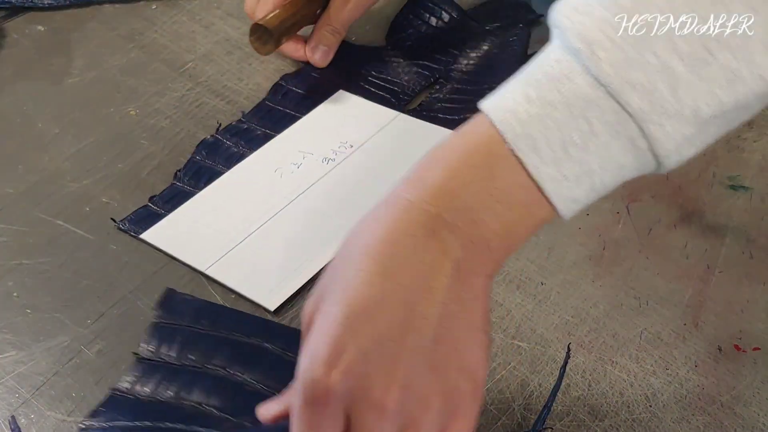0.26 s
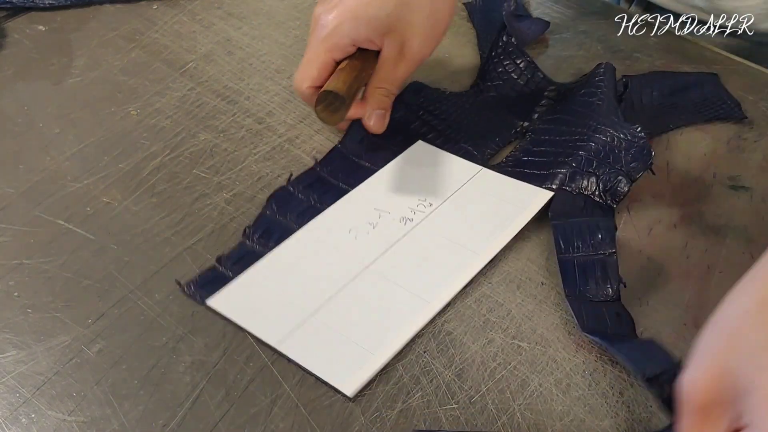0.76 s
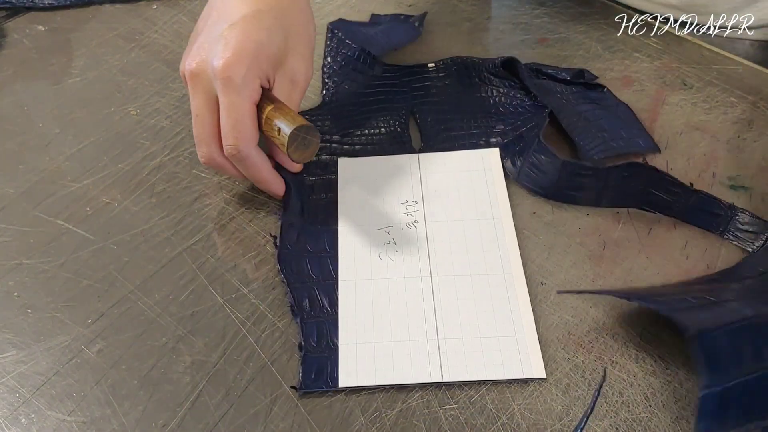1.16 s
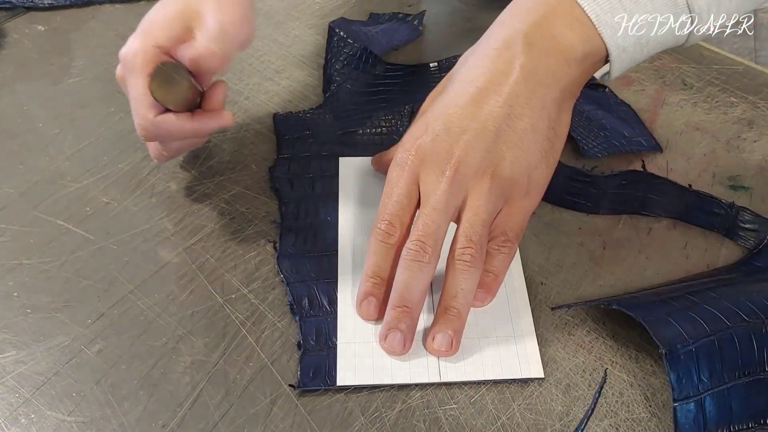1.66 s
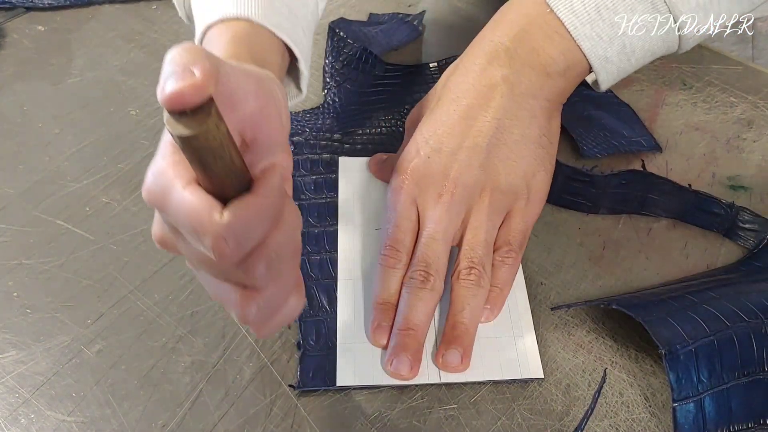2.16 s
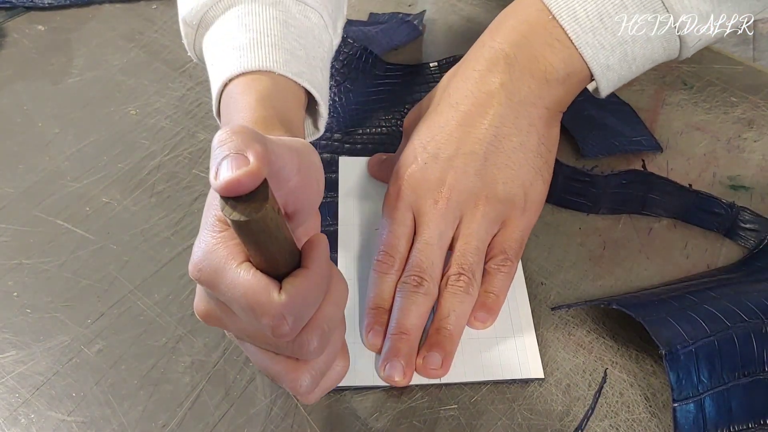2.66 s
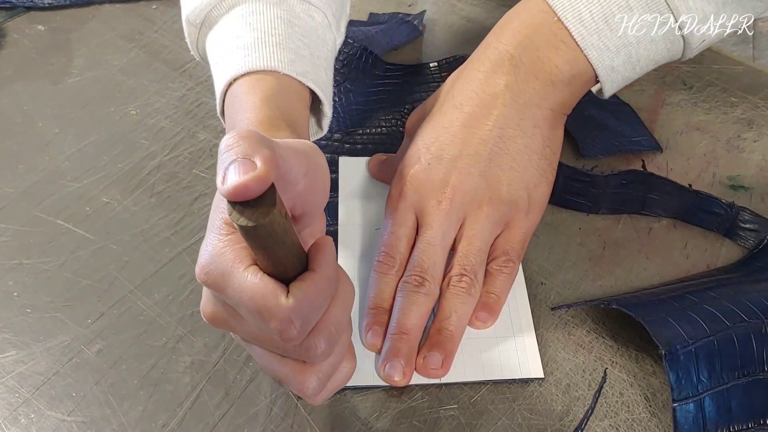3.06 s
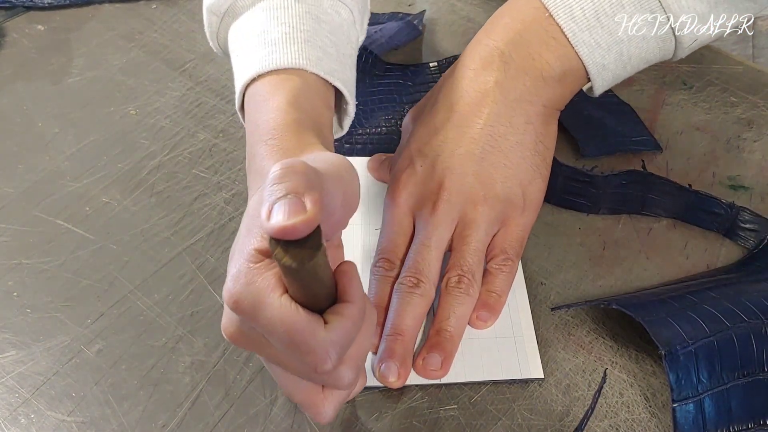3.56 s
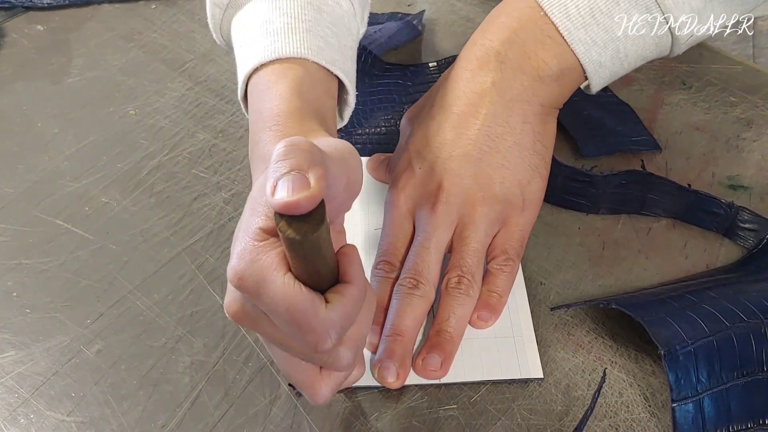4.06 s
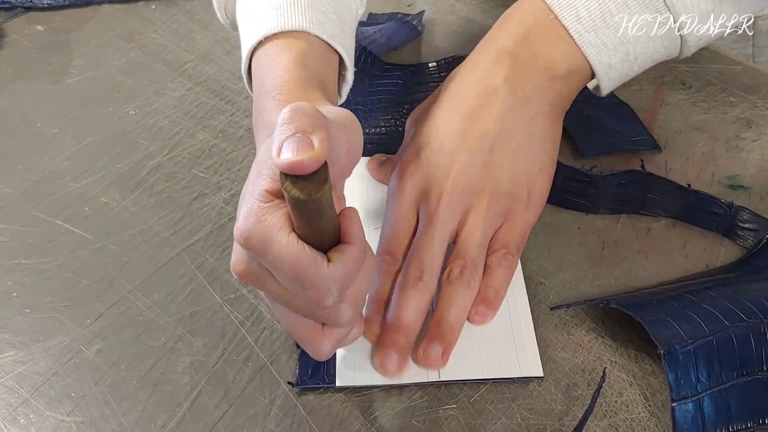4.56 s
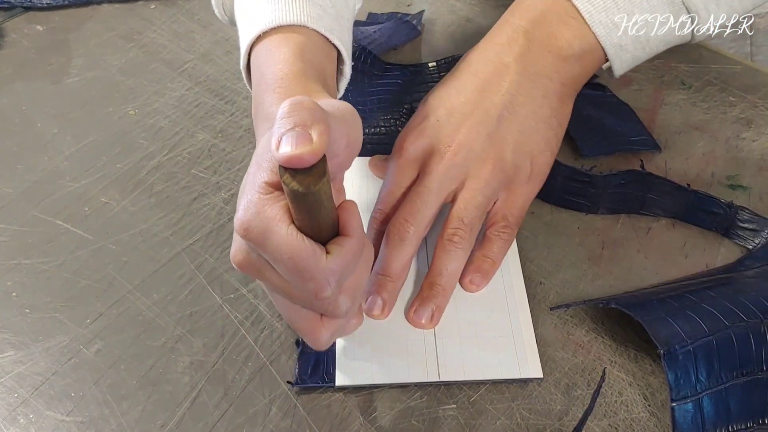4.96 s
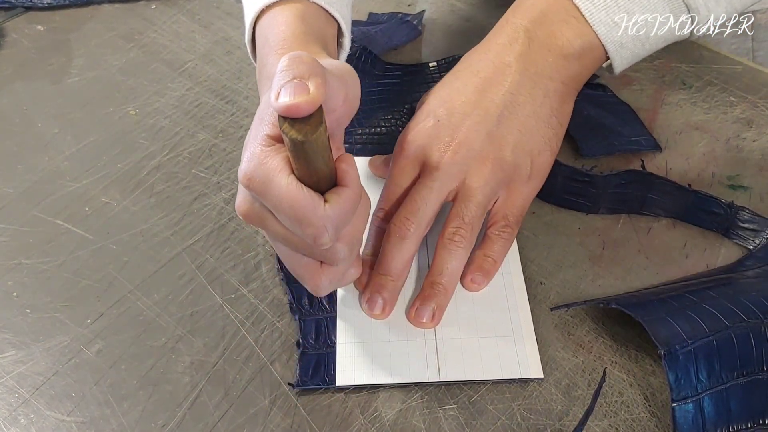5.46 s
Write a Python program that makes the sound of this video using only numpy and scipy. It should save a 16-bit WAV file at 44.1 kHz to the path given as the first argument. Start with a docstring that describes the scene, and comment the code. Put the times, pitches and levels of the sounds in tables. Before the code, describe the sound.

Close handling of thick leather: raspy scuffs, a clacking turn of card and hide, then dull bench thumps and brief stick-slip creaks of a blade. After quiet, small ticks lead to a hissing slice, a rapid tearing run and a hard snap, then smaller cuts. Small, slightly live room, faint hum, stereo phone leaning right.

```python
"""Leather scuffs and rasps as it is dragged over a bench; a blade creaks, hisses, snaps free and hisses
on through a few more short cuts. Place: a small workshop with a faint hum. Distance: close.
Microphone: a phone with two ports, the right one favoured. Filtered grains make the hide and its
card template, slip impulses the creak, short clicks and cracks the parting fibres, a swaying low
mode and rumble the bench top."""
import sys
import numpy as np
from scipy import signal
from scipy.fft import rfft, irfft, next_fast_len
from scipy.io import wavfile
from scipy.ndimage import map_coordinates

SR = 44100
rng = np.random.default_rng(int(sys.argv[2]) if len(sys.argv) > 2 else 0)


def wav_record(signal):
    """Record a signal, one row per channel, as 16-bit PCM in the file named by sys.argv[1]."""
    frames = np.transpose(np.atleast_2d(signal))
    bounded = np.clip(frames, -1, 1)
    # unit amplitude maps onto the largest positive 16-bit level
    quanta = np.round(bounded * 32767).astype(np.int16)
    wavfile.write(sys.argv[1], SR, quanta)


N = 251370
TIME = np.arange(N) / SR

# Levels of the work are relative: mixing gains, room and microphone follow.
# Still air of the workshop: (frequency [Hz], relative level [dB per Hz])
AIR_SPECTRUM = [(13, -13), (22, -3.5), (49, 7), (215, -10.5), (246, -6.5), (324, -19.5), (414, -9),
                (450, -11.5), (1350, -28.5), (1590, -22), (1730, -22.5), (3070, -28), (6440, -38),
                (7390, -44), (15500, -58)]
AIR_DB = -66.5  # before the balance of the two ports
# Faint hum: (frequency [Hz], level before waver and port balance [dB])
HUM_TONES = [(407.6, -78.5), (111.6, -74.5), (136, -107)]

# A hand or the knife bears down on the bench:
# (time of greatest weight [s], half length to 20 dB down [s], boom level [dB])
BENCH_PRESSES = [(0.083, 0.061, -42.5), (0.477, 0.029, -46.5), (0.904, 0.045, -42.5), (1.943, 0.048, -36),
                 (2.018, 0.036, -36.5), (2.129, 0.028, -46), (2.251, 0.046, -48.5), (2.674, 0.062, -48.5),
                 (2.81, 0.038, -51.5), (3.677, 0.075, -55), (3.907, 0.088, -46), (4.358, 0.032, -50),
                 (4.464, .04, -51), (4.545, 0.055, -48), (4.623, 0.039, -48.5), (4.855, 0.049, -44.5),
                 (4.936, 0.015, -35.5), (4.984, 0.054, -33.5), (5.402, 0.027, -43.5), (5.511, 0.029, -43),
                 (5.612, 0.036, -44.5)]
BOOM_HZ = 132.5  # lowest mode of the bench
# Dull rumble around the boom: (frequency [Hz], relative level [dB per Hz])
RUMBLE_SPECTRUM = [(30, -6.5), (60, -5.5), (110, 8.5), (190, 5.5), (300, -9), (520, -13), (800, -33.5),
                   (2000, -45.5)]

# Short scuffs, groans and squeaks of fingers, hide and blade:
# (centre time [s], half length, at most 0.1 in use [s], centre [Hz], width [Hz], level [dB])
SCUFF_EVENTS = [(.085, 0.056, 1680, 405, -63), (0.21, .025, 2900, 1510, -55),
                (0.469, .05, 1850, 700, -58.5), (0.561, 0.047, 3300, 3100, -59.5),
                (0.612, 0.014, 2590, 350, -52.5), (0.672, 0.025, 1660, 403, -54.5),
                (0.756, 0.035, 1340, 496, -52), (.89, 0.033, 1710, 500, -44), (.991, .11, 2450, 500, -51.5),
                (1.246, 0.033, 1340, 900, -65), (1.477, 0.072, 740, 513, -56.5),
                (1.473, .035, 2010, 1360, -52.5), (2.086, 0.061, 244, 99.7, -40.5),
                (2.193, .04, 288, 60, -55), (3.043, 0.026, 3030, 3150, -78),
                (3.459, .055, 1669, 1080, -68.5), (4.39, 0.038, 2580, 140, -71.5),
                (4.472, .04, 2580, 140, -74), (4.609, 0.031, 4850, 10500, -61.5),
                (4.835, 0.054, 815, 220, -55), (5.274, .012, 3530, 450, -56.5),
                (5.314, 0.054, 3630, 300, -71)]

# Fibres parting and small knocks of blade, card and handle:
# (time [s], click level [dB], bench knock level [dB], click pitch [Hz])
TICK_EVENTS = [(.052, -50, -49, 1950), (.079, -44, -58, 1490), (.399, -47, -60.5, 2660),
               (.745, -43, -75, 1410), (.835, -24, -41.5, 1460), (.904, -31, -49.5, 1250),
               (.911, -29, -43, 1290), (1.464, -39.5, -61, 1930), (2.083, -55, -33, 1535),
               (2.336, -60, -33.5, 1900), (3.387, -60, -52, 2320), (3.588, -60, -53.5, 2303),
               (3.633, -56.5, -51, 2281), (3.708, -60.5, -49, 2220), (3.768, -59.5, -45, 2651),
               (3.82, -53, -43.5, 1940), (3.86, -57.5, -37.5, 2790), (3.877, -57, -38, 2800),
               (4.104, -43, -54, 4264), (4.137, -31, -45, 4200), (4.528, -57, -48, 2266),
               (4.598, -48.5, -65, 3260), (4.616, -43, -55.5, 2800), (4.9186, -13, -34.5, 2975),
               (4.965, -15.5, -40.5, 2790), (5.495, -53, -45, 2220), (5.508, -47.5, -43, 2300),
               (5.559, -41, -73, 4900), (5.566, -47, -69, 5080), (5.591, -44.5, -55.5, 2800)]
# Modes of the bench top: (frequency [Hz], level before a small scatter [dB], t60 [s])
BENCH_MODES = [(204.6, -2, 0.14), (268.5, -3.5, 0.14), (302.4, -14, 0.25), (415.1, -2, 0.18),
               (499.6, -4, 0.15), (637, -6, 0.09), (757, -12.5, .06), (895, -8.5, 0.037),
               (934.5, -13.5, 0.093)]
# Spectrum of a crack of fibres: (multiple of the click pitch [ratio], level [dB])
CRACK_SPECTRUM = [(.2, -25), (0.452, -10.5), (0.699, 4), (1.1, -0.5), (1.6, 2), (2.4, -5.5), (3.6, -7),
                  (4.8, -24)]
# Resonances of the knife when a catch lets go: (frequency [Hz], level [dB])
KNIFE_MODES = [(2310, -11.5), (2480, -18), (3320, -17)]

# Hide and card pushed over the bench: (start time [s], length [s], time to rise or fall 20 dB [s],
# rub [dB], fine hiss [dB], card [dB], bench boom [dB], swell start to end [dB], arch in the middle [dB])
HIDE_SLIDES = [(0.089, 0.17, 0.3, -75.5, -67, -85, -67, 2.5, 7),
               (0.373, 0.18, 0.26, -56.5, -60.5, -77, -68, 9.5, 1.5),
               (0.61, .18, 0.22, -57.5, -69.5, -64.5, -61.5, 2.5, -1.5),
               (0.853, 0.3, 0.06, -51, -56.5, -50.5, -61, -0.5, 6),
               (1.458, 0.27, 0.1252, -52.5, -62.5, -74, -82, 5.5, -2)]
# Resonances of the sliding card: (frequency [Hz], width [Hz], level [dB])
CARD_MODES = [(990, 270, -2.5), (1260, 157, -3), (1610, 180, -11), (2406, 226, -8), (3470, 950, -17),
              (5800, 300, -27.5)]
# Rub of the hide, with a low rumble of the handled phone beneath:
# (frequency [Hz], relative level [dB per Hz])
RUB_SPECTRUM = [(35, 7), (90, -6), (220, -9), (450, -8.5), (800, -9.5), (1300, -4.5), (2000, 3),
                (2600, -7.5), (3200, -10), (5000, -31)]
# Fine hiss of the sliding hide: (frequency [Hz], relative level [dB per Hz])
FINE_SPECTRUM = [(500, -9), (1500, 4.5), (3000, 2), (5000, -2), (8000, 0.5), (16000, -13)]
FLUTTER_DB, FLUTTER_PER_S = 1.5, 22  # a sliding hide grips unevenly
# The sliding hide rasps now in one band, now in another: (centre [Hz], width [Hz], level [dB])
RASP_BANDS = [(1355, 200, 0), (1660, 180, 2), (2050, 240, -1.5), (2490, 220, -3.5)]
# Level beside the rub [dB], depth [dB] and speed [per s] of the changes
RASP_DB, RASP_SWING_DB, RASP_PER_S = -9.5, 7.5, 25

# Strokes in which the blade sticks and slips: (start time [s], length [s], creak level [dB],
# crispness [dB], swell [dB], top pace before unevenness [slips per s], unevenness [0-1])
CREAK_STROKES = [(2.028, 0.061, -40.5, -61.5, 1, 337, 0.08), (2.12, 0.082, -60.5, -108, -8, 293, .25),
                 (2.337, .055, -37.5, -64, -6.5, 318, .04), (2.411, 0.11, -55, -95, 6, 340, .2),
                 (3.35, .125, -58, -87, 14.5, 200, .65), (3.63, 0.082, -68.5, -86, 4, 125, 0.46),
                 (3.78, 0.13, -46.5, -84, 3.5, 135, 0.39)]
STROKE_ATTACK_S, STROKE_RELEASE_S = 0.024, 0.02  # time to rise or fall 20 dB
# Shares of the top pace: at the ends of a stroke, and while the blade barely moves
END_PACE, SLOWEST_PACE = .65, .42
# The bench groans under the blade: (centre [Hz], width [Hz], level [dB])
GROAN_MODES = [(240, 70, -1.5), (307, 40, -3.5)]
GROAN_DB, STROKE_BOOM_DB = -13, -5.5  # relative to the creak
CRISP_SCATTER_DB = 3  # a few slips tick much louder than the rest
CREAK_LOW_HZ = 120  # the bench hardly radiates below this

# The blade gliding through the hide: (start time [s], length [s], hiss [dB], blade whistle [dB],
# rub on the card's edge [dB], bench boom [dB], swell [dB])
BLADE_PULLS = [(4.132, 0.36, -68.5, -65.5, -76, -68.5, -6.5), (4.938, 0.28, -65.5, -65, -70, -48, -12),
               (5.269, .15, -64.5, -67, -63.5, -53.5, 1), (5.56, 0.044, -60.5, -71, -71.5, -60, -5)]
# Time to rise 20 dB, as a share of the length (a long pull starts more gently), and to fall 20 dB
PULL_ATTACK_SHARE, PULL_RELEASE_S = 0.43, 0.078
# Central pitch of the blade's whistle: (time [s], frequency [Hz])
WHISTLE_PITCH = [(4.15, 2115), (4.38, 2256), (5.1, 2252), (5.45, 2233)]
# Resonances of the blade against the card: (frequency [Hz], width [Hz], level [dB])
BLADE_MODES = [(846, 37, 0), (1810, 64, -5.5), (2223, 41, 1.5), (3340, 94, -14.5), (3750, 40, -28.5),
               (5030, 390, -22)]
# Hiss of the cut: (frequency [Hz], relative level [dB per Hz])
FIBRE_SPECTRUM = [(500, -8), (1500, 1.5), (3000, 3), (5000, -2.5), (7500, 3), (12000, -7.5), (16000, -19)]

# A tough strip of hide gives way in catches that come ever faster and higher
TEAR_START_S, TEAR_GAP_S, TEAR_SHRINK = 4.799, .025, .84  # first catch, first gap, gap over gap before
TEAR_CLICK_DB, TEAR_KNOCK_DB, TEAR_SCATTER_DB = -37.5, -38, 1  # central levels and their scatter
TEAR_EASE_DB = 1  # each catch tends to push the bench less than the one before
TEAR_HZ, TEAR_STEP_HZ = 2090, 80  # pitch of the first click, rise per catch

# Decay of the workshop: (frequency [Hz], t60 [s])
ROOM_DECAY = [(130, 0.41), (400, 0.35), (2500, 0.33), (7000, 0.29), (14000, 0.61)]
# The microphone's port rings near 7 kHz and shuts out what lies above: (frequency [Hz], gain [dB])
PORT_RESPONSE = [(5600, -0.5), (6300, 0.5), (6800, 13), (7200, 14), (7800, 2), (8800, -23), (10200, -14),
                 (11500, -9.5), (12700, -8), (14000, -12), (15500, -24.5)]
# The left port faces away from the bench: (frequency [Hz], left minus right [dB])
LEFT_SHADE = [(130, -8.5), (500, -12), (1100, -13.5), (2200, -27.5), (4500, -15), (7100, -29.5),
              (9000, -8.5), (11500, -8), (15000, -8.5)]
TOP_HZ = 15800  # the phone's band limit


def amp(db):
    """Decibels to gain."""
    return 10 ** (np.asarray(db) / 20)


def unit(x):
    """Scale to rms 1."""
    return x / np.sqrt(np.mean(x ** 2) + 1e-20)


def along(points, hz):
    """(Hz, value) points read on a log axis."""
    f, v = np.transpose(points)
    return np.interp(np.log(hz + 1), np.log(f + 1), v)


def wobble(rate):
    """A smooth random curve, rate knots a second."""
    knots = rng.standard_normal(int(N * rate / SR) + 4)
    return map_coordinates(knots, [TIME * rate])


def filtered(x, response):
    """x times a complex response of frequency."""
    m = 2 * next_fast_len(N // 2 + SR // 4)
    return irfft(rfft(x, m) * response(np.fft.rfftfreq(m, 1 / SR)), m)[..., :N]


def coloured(x, points):
    """Causal filter with the gain of (Hz, dB) points."""
    def response(hz):
        # fold the cepstrum forward in time for minimum phase
        cepstrum = irfft(np.log(amp(along(points, hz))))
        half = len(cepstrum) // 2
        cepstrum[1:half] *= 2
        cepstrum[half + 1:] = 0
        return np.exp(rfft(cepstrum))
    return filtered(x, response)


def resonant(x, modes):
    """x through parallel (Hz, width Hz, dB) resonances of alternating sign."""
    def response(f):
        total = 0
        for k, (centre, width, db) in enumerate(modes):
            damping = 1j * f * width
            total = total + (-1) ** k * amp(db) * damping / (centre ** 2 - f * f + damping)
        return total
    return filtered(x, response)


def grains(rate, spread_db):
    """Dense tiny impulses of uneven size, rms 1."""
    chance, size = rng.random(N), rng.standard_normal(N)
    return unit((chance < rate / SR) * size * amp(spread_db * wobble(250)))


def stroke(start, length, attack_s, release_s, swell_db, arch_db=0):
    """Gain of one movement: attack, a hold that swells and arches, release."""
    u = np.clip((TIME - start) / length, 0, 1)
    before = np.maximum(start - TIME, 0) / attack_s
    after = np.maximum(TIME - start - length, 0) / release_s
    hold_db = swell_db * (u - .5) + arch_db * np.sin(np.pi * u)
    return amp(hold_db - 20 * np.minimum(before + after, 10))


def background():
    """Still workshop air, partly shared by both ports, with a faint hum that wavers slightly."""
    shared = rng.standard_normal(N)
    separate = 1.6 * rng.standard_normal((2, N))
    air = unit(coloured(shared + separate, AIR_SPECTRUM))
    hum = 0
    for hz, db in HUM_TONES:
        level = amp(db + 1.5 * wobble(4.1))
        hum = hum + level * unit(np.sin(2 * np.pi * hz * TIME + .5 * wobble(3.4)))
    return (amp(AIR_DB) * air + hum) * amp([[-4], [3]])  # left, right


def boom(work):
    """Each press, and more weakly all the work, sways the bench's lowest mode, with a dull rumble around it."""
    presses = [amp(db - 20 * np.minimum(((TIME - s) / half) ** 2, 10)) for s, half, db in BENCH_PRESSES]
    lean = np.linalg.norm(presses + [work * amp(2.6 * wobble(16))], axis=0)
    sway = unit(np.sin(2 * np.pi * BOOM_HZ * TIME + 0.8 * wobble(12)))
    rumble = unit(coloured(rng.standard_normal(N), RUMBLE_SPECTRUM))
    return lean * (amp(-1.5) * sway + amp(-10) * rumble)


def scuffs():
    """A brief rub excites one band of resonance for a moment."""
    out, hz = np.zeros(N + SR), np.fft.rfftfreq(SR // 4, 1 / SR)
    for s, half, centre, width, db in SCUFF_EVENTS:
        band = 1 / (1 + (2 * (hz - centre) / width) ** 2)
        rub = irfft(rfft(rng.standard_normal(SR // 4)) * band)
        swell = np.hanning(min(round(2 * half * SR), SR // 5))
        first = max(round((s - half) * SR), 0)
        out[first:][:len(swell)] += amp(db - 3.5) * unit(swell * rub[:len(swell)])
    return out[:N]


def bench_ring(thump_db, thump_t60):
    """The bench's answer to one push, peak 1: a dull thump and its decaying modes."""
    t = np.arange(SR // 4) / SR
    ring = amp(thump_db - 60 * t / thump_t60) * np.sin(2 * np.pi * 430 * t)
    for k, (hz, db, t60) in enumerate(BENCH_MODES):
        decay = amp(db + rng.normal(0, 1) - 60 * t / t60)
        ring += (-1) ** k * decay * np.sin(2 * np.pi * hz * t)
    ring = signal.sosfilt(signal.butter(4, 1050, fs=SR, output="sos"), ring)
    return ring / np.abs(ring).max()


def ticks(rows, cycles, click_level_db, crack_db, crack_t60, ring_db):
    """Each break is a short click, a crack of fibres, a damped ring of the knife and a knock in the bench."""
    out, t = np.zeros(N + SR), np.arange(SR // 4) / SR
    ratio, level = np.transpose(CRACK_SPECTRUM)
    knife = sum(amp(db) * np.sin(2 * np.pi * hz * t) for hz, db in KNIFE_MODES)
    for s, click_db, knock_db, hz in rows:
        age = t * hz / cycles
        click = np.sin(2 * np.pi * hz * t) * (2 * age) ** 2 * np.exp(2 - 4 * age)
        # a light catch lets the knife ring on; a loud snap is over at once
        life = np.interp(click_db, [-30, -18], [.03, .005])
        ring = amp(ring_db - 60 * t / life) * knife
        crack = amp(crack_db - 60 * t / crack_t60) * rng.standard_normal(len(t))
        crack[round(1.25 * SR / hz)] += amp(6)  # the instant of parting
        shape = amp(np.interp(np.fft.rfftfreq(len(t), 1 / SR) / hz, ratio, level))
        crack = irfft(rfft(crack) * shape, len(t))
        crack[-(SR // 200):] = 0  # drop what the filter wraps from before the start
        knock = bench_ring(thump_db=6.5, thump_t60=0.021)
        snap = amp(click_db) * (amp(click_level_db) * click + ring + crack)
        out[round(s * SR):][:len(t)] += snap + amp(knock_db - 3.5) * knock
    return out[:N]


def slide_levels():
    """Gains of rub, fine hiss, card and bench boom: one movement drives all four."""
    return sum(np.outer(amp(levels), stroke(s, length, ramp, ramp, swell, arch))
               for s, length, ramp, *levels, swell, arch in HIDE_SLIDES)


def drag(rub, fine, turn):
    """The hide's grain catches on the bench and rasps in shifting bands; the stiff card rings as it swings."""
    grip = amp(FLUTTER_DB * wobble(FLUTTER_PER_S))
    card = unit(resonant(grains(rate=1500, spread_db=0), CARD_MODES))
    catches = grains(rate=1800, spread_db=0)
    rasp = 0
    for band in RASP_BANDS:
        swing = amp(RASP_SWING_DB * np.tanh(wobble(RASP_PER_S)))
        rasp = rasp + resonant(catches, [band]) * swing
    grain = unit(coloured(grains(rate=1800, spread_db=0.5), RUB_SPECTRUM))
    hide = grip * rub * (amp(-7) * grain + amp(RASP_DB) * unit(rasp))
    hiss = unit(coloured(grains(rate=9000, spread_db=2.5), FINE_SPECTRUM))
    return amp(0.5) * turn * card + hide + amp(-6.5) * fine * hiss


def stroke_levels():
    """Gains of creak and crispness as the blade is forced on."""
    return sum(np.outer(amp(levels), stroke(s, length, STROKE_ATTACK_S, STROKE_RELEASE_S, swell))
               for s, length, *levels, swell, _, _ in CREAK_STROKES)


def slip_train():
    """One impulse per slip; the underlying pace is highest in the middle of the nearest stroke."""
    start, length, *_, top, uneven = np.transpose(CREAK_STROKES)
    offset = np.abs(TIME[:, None] - start - length / 2)
    k = np.argmin(offset - length / 2, axis=1)  # nearest stroke
    from_middle = np.minimum(2 * offset[np.arange(N), k] / length[k], 2)
    rate = top[k] * np.maximum(END_PACE ** from_middle ** 2, SLOWEST_PACE)
    slip_count = np.cumsum(rate * np.exp(uneven[k] * wobble(170))) / SR
    at = np.flatnonzero(np.diff(np.floor(slip_count)))
    scatter = amp((1.5 - 1.1 * uneven[k]) * rng.standard_normal(N))
    slips = np.zeros(N)
    slips[at] = (np.sqrt(SR / rate) * scatter)[at]
    return slips


def creaks(push, crisp):
    """The blade sticks and slips; each slip pushes the bench, makes it groan and gives a crisp tick."""
    slips = slip_train()
    ring = bench_ring(thump_db=8.5, thump_t60=0.033)
    body = signal.fftconvolve(slips * push, ring / np.linalg.norm(ring))[:N]
    groan = resonant(slips * push, GROAN_MODES) / np.std(resonant(slips, GROAN_MODES))
    highpass = signal.butter(2, CREAK_LOW_HZ, "high", fs=SR, output="sos")
    low = signal.sosfilt(highpass, amp(-4.5) * body + amp(GROAN_DB) * groan)
    sizes = amp(CRISP_SCATTER_DB * np.clip(rng.standard_normal(N), -2, 2))
    # each slip opens a noise burst that dies with a time constant of 2.1 ms
    burst = signal.lfilter([1], [1, -np.exp(-1 / (0.0021 * SR))], slips * sizes)
    tear = burst * rng.standard_normal(N)
    crisp_points = [(400, -3), (1300, 10), (2000, 16.5), (4500, 4.5), (9000, 4.5), (16000, 0.5)]
    return low + amp(-1) * crisp * unit(coloured(tear, crisp_points))


def pull_levels():
    """Gains of hiss, whistle, edge rub and bench boom as the blade is pulled."""
    return sum(np.outer(amp(levels), stroke(s, length, PULL_ATTACK_SHARE * length, PULL_RELEASE_S, swell))
               for s, length, *levels, swell in BLADE_PULLS)


def slicing(hiss, whistle, edge):
    """Fibres hiss past the blade, which whistles faintly and rings where it rubs the card."""
    hz = np.interp(TIME, *np.transpose(WHISTLE_PITCH))
    phase = 2 * np.pi * np.cumsum(hz + 30 * wobble(9.6)) / SR
    # two random quadratures blur the whistle into a narrow band
    band = wobble(240) * np.sin(phase) + wobble(240) * np.cos(phase)
    tone = unit(amp(3.64 * wobble(20)) * band)
    fibres = unit(coloured(grains(rate=6100, spread_db=2.5), FIBRE_SPECTRUM))
    ring = unit(resonant(grains(rate=4400, spread_db=2), BLADE_MODES))
    return amp(-3.5) * hiss * fibres + amp(-6.5) * whistle * tone + amp(-1) * edge * ring


def tear_catches(count):
    """The quickening run of catches before the blade snaps free, as rows like those of TICK_EVENTS."""
    k = np.arange(count)
    gaps = TEAR_GAP_S * TEAR_SHRINK ** k[:-1]
    times = TEAR_START_S + np.append(0, np.cumsum(gaps))
    click, knock = TEAR_SCATTER_DB * rng.standard_normal((count, 2)).T
    knock_db = TEAR_KNOCK_DB + knock - TEAR_EASE_DB * (k - k.mean())
    return list(zip(times, TEAR_CLICK_DB + click, knock_db, TEAR_HZ + TEAR_STEP_HZ * k))


def workshop(x, wet_db, near_db, left_db):
    """Near surfaces reflect within milliseconds; the room's noise tail decays at its own pace in each band."""
    hz, t, z = signal.stft(rng.standard_normal((2, SR // 2)), SR, nperseg=256)
    decay = amp(-60 * t / along(ROOM_DECAY, hz)[:, None])
    tail = signal.istft(z * decay, SR, nperseg=256)[1]
    tail = np.pad(tail / np.linalg.norm(tail[0]), ((0, 0), (SR // 250, 0)))  # 4 ms before the tail
    echoes = [(.0056, 1), (.0127, .34), (.022, .5)]  # (delay [s], gain)
    near = filtered(x, lambda f: sum(gain * np.exp(-2j * np.pi * f * delay) for delay, gain in echoes))
    # the shaded left port hears relatively more room
    wet = amp([[wet_db + left_db], [wet_db]]) * signal.fftconvolve(x[None], tail, axes=1)[:, :N]
    return x + amp(near_db) * near + wet


def scene():
    """The work on the bench reaches mostly the right port."""
    rub, fine, turn, slide_boom = slide_levels()
    push, crisp = stroke_levels()
    hiss, whistle, edge, pull_boom = pull_levels()
    clicks = ticks(TICK_EVENTS, cycles=1.16, click_level_db=-4.5, crack_db=-16, crack_t60=0.031, ring_db=-9)
    catches = ticks(tear_catches(count=8), cycles=1.5, click_level_db=-5, crack_db=-21, crack_t60=.02,
                    ring_db=-3)
    direct = scuffs() + clicks + drag(rub, fine, turn) + creaks(push, crisp)
    direct = direct + slicing(hiss, whistle, edge) + catches
    bench = boom(slide_boom + pull_boom + amp(STROKE_BOOM_DB) * push)
    work = workshop(direct, wet_db=-6.5, near_db=-13.5, left_db=4.5) + bench
    left, right = amp(4) * coloured(work, PORT_RESPONSE)
    return np.array([coloured(left, LEFT_SHADE), right]) + background()


def record(dry):
    """The phone cuts steeply above its band limit."""
    return filtered(dry, lambda hz: 1 / np.sqrt(1 + (hz / TOP_HZ) ** 160))


dry = scene()
out = record(dry)
wav_record(out)
```